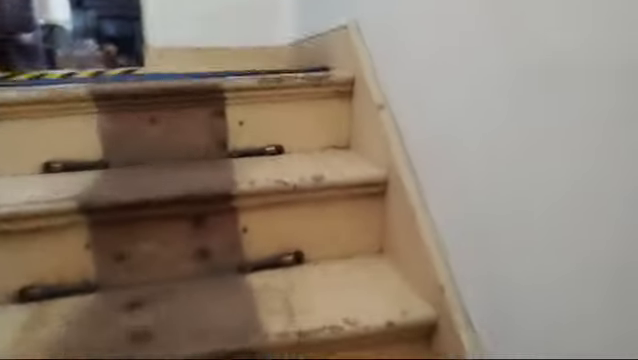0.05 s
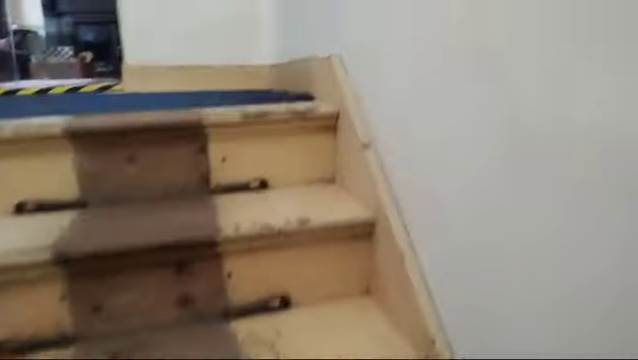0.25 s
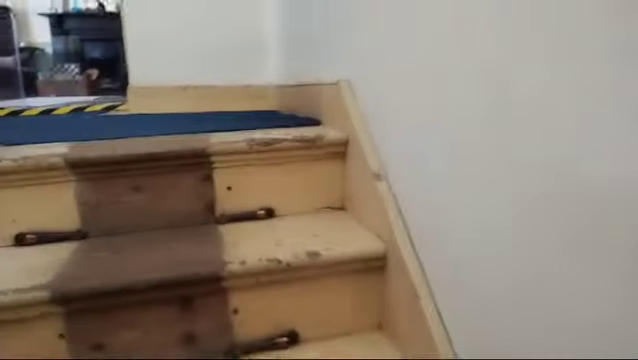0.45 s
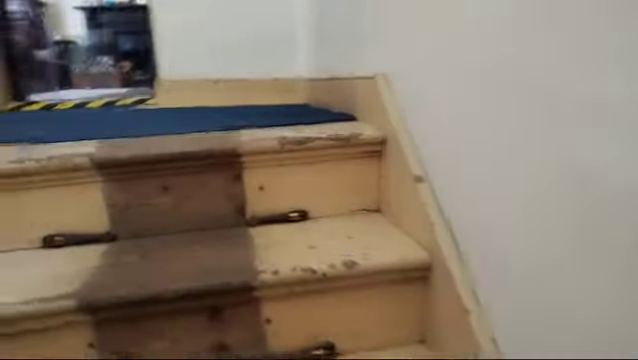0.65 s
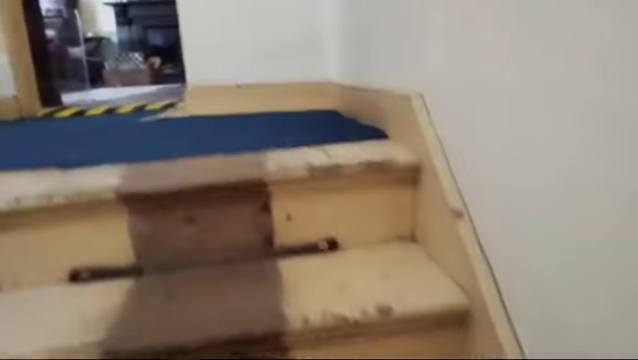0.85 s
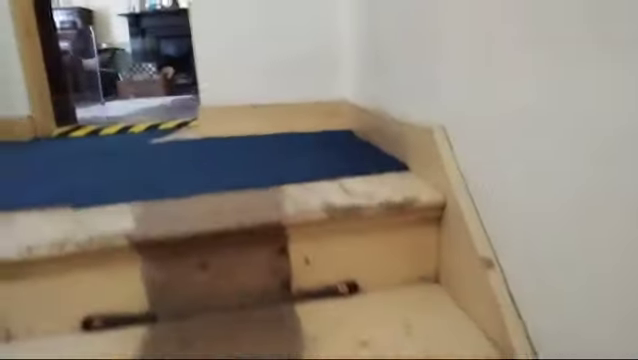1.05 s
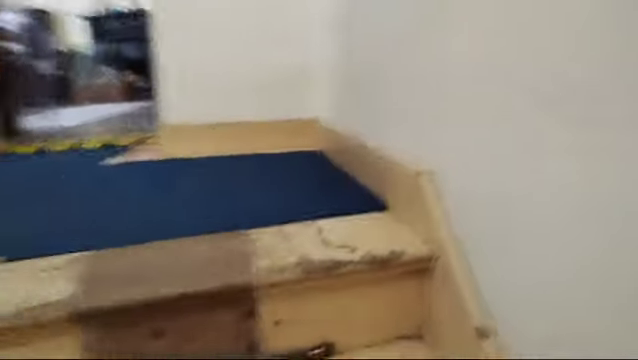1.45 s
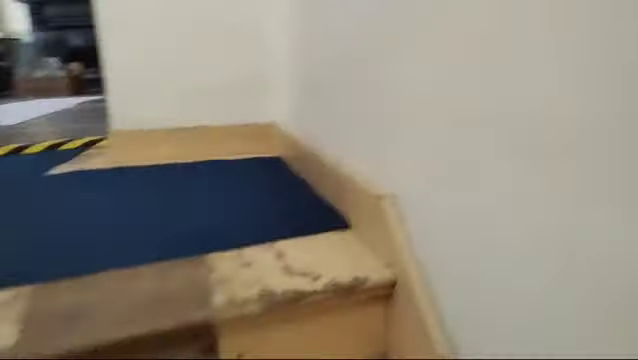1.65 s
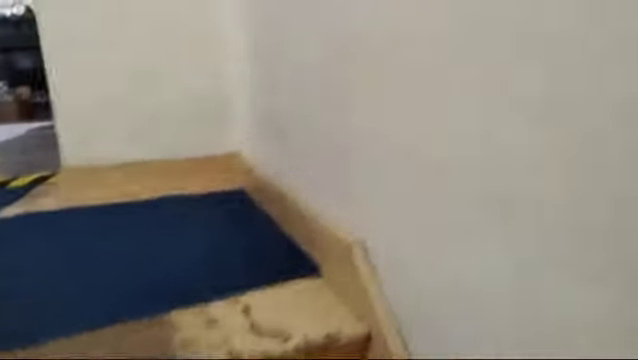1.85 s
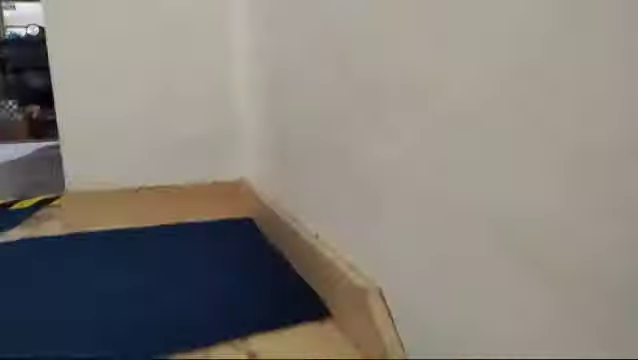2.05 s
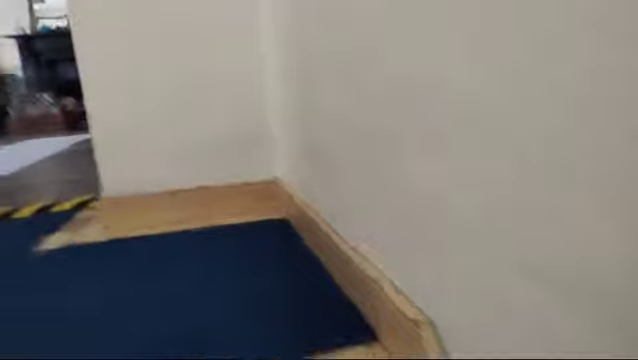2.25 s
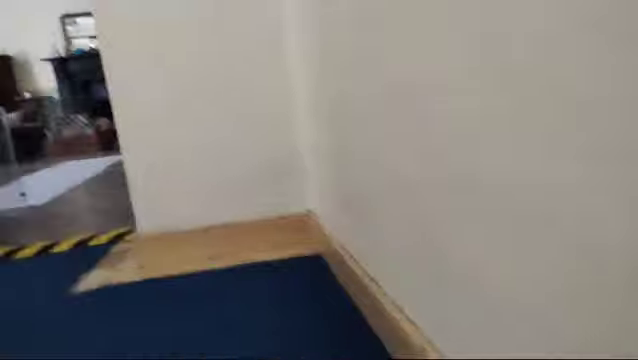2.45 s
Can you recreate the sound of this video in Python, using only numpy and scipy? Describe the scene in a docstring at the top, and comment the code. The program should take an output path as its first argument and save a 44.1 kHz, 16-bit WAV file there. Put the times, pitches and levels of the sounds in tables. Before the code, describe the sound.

Footsteps climbing wooden stairs, low uneven thuds with a sole scuff and faint rustle.

```python
"""Footsteps up a wooden staircase

Someone climbs a narrow stairwell, holding a camera. Four heavy footfalls ring the stair and boom
between the walls, with lighter knocks as the weight shifts. A board cracks, a sole slides over a
tread, clothes rustle, and a finger taps the camera once."""
import sys
import numpy as np
from scipy import signal
from scipy.fft import rfft, irfft, next_fast_len
from scipy.io import wavfile
from scipy.ndimage import uniform_filter1d, map_coordinates

SR = 44100
rng = np.random.default_rng(int(sys.argv[2]) if len(sys.argv) > 2 else 0)


def output_pcm(signal):
    """Save a mono or channel-first signal as 16-bit PCM at the path in sys.argv[1].

    Samples are clipped to [-1, 1] before scaling.
    """
    pcm = np.clip(np.atleast_2d(signal).T, -1, 1) * 32767
    wavfile.write(sys.argv[1], SR, np.round(pcm).astype(np.int16))


N = 110250

# spectrum of the boom between the walls: f/Hz, level/dB
BOOM_SPECTRUM = [(30, -84), (55, -17), (80, -4.5), (130, -0.5), (200, 3), (330, -1.5), (520, -2),
                 (610, -7.5), (760, -13.5), (1000, -16), (1600, -26), (3000, -60)]
TREAD_RISE_S, TREAD_T60_S = 0.0039, 0.13


def amp(db):
    """Decibels to gain."""
    return 10 ** (np.asarray(db) / 20)


def along(points, hz):
    """Read a curve of (frequency, value) points on a log frequency axis."""
    freqs, values = np.transpose(points)
    return np.interp(np.log(hz + 1), np.log(freqs + 1), values)


def filtered(x, response):
    """Equalise x with a gain given as a function of frequency."""
    size = next_fast_len(N + 8192)
    return irfft(rfft(x, size) * response(np.fft.rfftfreq(size, 1 / SR)), size)[..., :N]


def since(start):
    """Seconds since start, zero before it."""
    return np.maximum(np.arange(N) / SR - start, 0)


def swell(start, rise, hold, t60):
    """Envelope with attack, hold and exponential release, all in seconds."""
    t = since(start)
    return (1 - np.exp(-t / rise)) * amp(-60 * np.maximum(t - hold, 0) / t60)


def note(start, hz, rise, t60):
    """One damped mode."""
    return swell(start, rise, 0, t60) * np.sin(2 * np.pi * hz * since(start))


def grain(rate, depth_db):
    """Random flutter of gain, with rate new values a second."""
    knots = rng.standard_normal(int(N * rate / SR) + 4)
    return amp(depth_db * map_coordinates(knots, [np.arange(N) * rate / SR]))


def diffuse(spectrum, colour=lambda hz: 1):
    """Shaped stereo noise of rms 1, narrow in the bass and wide in the treble."""
    # likeness of left and right: f/Hz, correlation
    likeness = [(60, 0.81), (200, 0.92), (450, 0.51), (800, 0.33), (1300, -0.34), (2500, 0.15),
                (5000, 0.0049)]

    def response(hz):
        width = np.arccos(np.clip(along(likeness, hz), -1, 1)) / 2
        return amp(along(spectrum, hz)) * colour(hz) * np.array([np.cos(width), np.sin(width)])
    mid, side = filtered(rng.standard_normal((2, N)), response)
    pair = np.array([mid + side, mid - side])
    power = uniform_filter1d(np.mean(pair ** 2, axis=0), size=2205)
    return pair / np.sqrt(np.abs(power) + 1e-20)


def room_tone():
    """The quiet of the house: a faint, steady bed of low noise."""
    # spectrum of the quiet house: f/Hz, level/dB
    spectrum = [(25, -57), (50, -21), (80, -3), (140, -2.5), (230, 4.5), (400, -0.5), (520, -23),
                (700, -14), (1200, -10.5), (1900, -11.5), (3800, -26), (5600, -20.5), (7400, -9.5),
                (9600, -26.5), (14000, -32.5)]
    return amp(-67) * diffuse(spectrum)


def rustle():
    """Cloth brushes as the legs move, and an airy high hiss swells with each step and movement."""
    # steps and movements: t/s, rise/s, hold/s, brush/dB, hiss/dB
    movements = [(0, 0.0013, 0.0073, -66.5, -69), (0.238, 0.014, 0.11, -58, -59.5),
                 (0.472, 0.01, 0.092, -59, -64.5), (0.639, 0.064, 0.094, -50.5, -56.5),
                 (0.861, 0.0067, 0.028, -66.5, -69), (1.117, 0.013, 0.062, -56, -59.5),
                 (1.195, 0.036, 0.11, -93, -70), (1.314, 0.036, 0.11, -55, -70),
                 (1.381, 0.018, 0.086, -44, -54), (1.946, 0.016, 0.28, -66, -73),
                 (2.262, 0.0048, 0.0067, -57.5, -56.5)]
    # dull brush of cloth: f/Hz, level/dB
    brush_spectrum = [(100, -33), (400, 6), (600, 3.5), (800, 3), (1100, -5), (1900, -5), (3000, -16.5),
                      (5000, -37.5)]
    # airy high hiss: f/Hz, level/dB
    hiss_spectrum = [(2000, -24), (4000, -16.5), (5600, -9.5), (6800, -4), (7500, 0), (8300, -5),
                     (9600, -16.5), (14000, -21.5)]
    brush, hiss = diffuse(brush_spectrum), diffuse(hiss_spectrum)
    swells = sum(swell(start, rise, hold, t60=0.46) * (amp(brush_db) * brush + amp(hiss_db) * hiss)
                 for start, rise, hold, brush_db, hiss_db in movements)
    return grain(rate=140, depth_db=0.8) * swells


def finger_tap():
    """A finger gives the camera body one low push and a thin tick."""
    # tick of the camera body: f/Hz, level/dB
    tick_spectrum = [(500, 8), (2000, -17), (4000, -15), (5600, -6.5), (7400, 7.5), (9500, -17),
                     (14000, -12)]
    start, push_hz, push_t60 = 1.8965, 205, 0.0071
    t = since(start)
    push = -amp(-32.5 - 60 * t / push_t60) * np.sin(2 * np.pi * push_hz * t)
    tick = amp(-39) * swell(start, rise=0.0001, hold=0.00024, t60=0.0023) * diffuse(tick_spectrum)
    return push + tick


def sole_slide():
    """A sole drags over the tread, hissing more as it speeds up."""
    # course of the slide, in relative levels: t/s, rasp/dB, hiss/dB
    course = [(1.5, -65, -71), (1.514, -65, -60), (1.55, -61, -60.5), (1.662, -53, -47.5),
              (1.706, -53, -49), (1.786, -69.5, -71), (1.86, -75.5, -77)]
    # low rasp of sole on wood: f/Hz, level/dB
    rasp_spectrum = [(30, -24), (70, -6), (140, 4.5), (220, 4.5), (320, -1), (700, 2), (1050, -4.5),
                     (1800, -4.5), (2700, -17.5), (4000, -69), (7000, -48)]
    # bright hiss of the slide: f/Hz, level/dB
    hiss_spectrum = [(1500, -12), (3000, -3), (4200, -9), (6400, -5.5), (7100, -1.5), (7550, 4), (8200, -4),
                     (9500, -17), (14000, -27)]
    times, rasp_db, hiss_db = np.transpose(course)
    t = np.arange(N) / SR
    contact = np.interp(t, [times[0] - 0.02, times[0], times[-1], times[-1] + 0.15], [0, 1, 1, 0])
    rasp = amp(10 + np.interp(t, times, rasp_db)) * diffuse(rasp_spectrum)
    hiss = amp(6 + np.interp(t, times, hiss_db)) * diffuse(hiss_spectrum)
    return contact * grain(rate=170, depth_db=0.8) * (rasp + hiss)


def board_cracks():
    """A bright-edged snap briefly rings a board and the microphone, and the walls answer."""
    # cracks of boards and shoes: t/s, snap/dB, ring/dB, room/dB, edge/dB
    cracks = [(0.7412, -33.5, -28.5, -45, -31), (.767, -51, -39.5, -54.5, -65), (1.511, -46, -62, -58, -44),
              (2.129, -46, -56, -61, -72), (2.176, -35.5, -64, -43, -56), (2.284, -43, -50, -55.5, -45)]
    # body of the snap: f/Hz, level/dB
    snap_spectrum = [(200, -18), (700, 7), (1300, -1.5), (1900, -1), (2700, -6), (4000, -13.5),
                     (5600, -10.5), (7400, -3), (9500, -19), (14000, -28)]
    # bright first edge of a crack: f/Hz, level/dB
    edge_spectrum = [(1000, -4), (4000, -3.5), (7400, 3), (10000, -2.5), (14000, -12.5)]
    # ringing tones of the crack, board modes plus a thin high microphone ring: f/Hz, level/dB, t60/s
    tones = [(1446, 7, 0.028), (1780, 1.5, 0.06), (2057, 10, 0.025), (2205, -4, 0.042), (3665, -20, 0.09),
             (7300, 3, 0.053)]
    snap = diffuse(snap_spectrum)
    room = diffuse(snap_spectrum) * grain(rate=840, depth_db=0.5)
    edge = diffuse(edge_spectrum)
    ring_pan = np.array([[-0.6], [1.1]])  # to the right, in opposite phase on the left
    out = np.zeros((2, N))
    for start, snap_db, ring_db, room_db, edge_db in cracks:
        t = since(start)
        ring = sum(amp(db - 60 * t / t60) * np.sin(2 * np.pi * hz * t) for hz, db, t60 in tones)
        attack = 1 - np.exp(-t / 0.0015)
        out += amp(edge_db) * swell(start, rise=0.0001, hold=0.00031, t60=0.0016) * edge
        out += amp(snap_db) * swell(start, rise=0.00011, hold=0.00081, t60=0.036) * snap
        out += amp(ring_db) * attack * ring * ring_pan
        out += amp(room_db) * swell(start, rise=0.0043, hold=0.016, t60=0.2) * room
    return out


def tread_colour(hz, tread_hz):
    """Each spot on the stair favours the frequencies around its own note."""
    width_octaves, off_note_db = 0.57, -12.5
    distance = np.log2((hz + 1) / tread_hz) / width_octaves
    return amp(off_note_db * (1 - np.exp(-0.5 * distance ** 2)))


def stair_ring(start, tread_hz):
    """The stair's modes build up under a soft sole and die away."""
    # modes of the wooden stair: f/Hz, level/dB, t60/s
    modes = [(80.2, -18, 0.82), (120, -6, 0.35), (183, -2.5, 0.37), (223.1, 3.5, 0.34), (236.5, -24, 1.2),
             (271.4, -10, 0.27), (318.4, 1.5, 0.2), (365.7, -6, 0.32), (410, -38, 2.73), (448.6, 2.5, 0.26),
             (481, -11, 0.43), (526, -33, 0.1), (726, 0, 0.19)]
    t = np.arange(SR) / SR
    spread = 0.00042 * np.array([[1], [-1]])  # rad/Hz: higher modes reach the two microphones less alike
    ring = np.zeros((2, SR))
    for k, (hz, db, t60) in enumerate(modes):
        envelope = tread_colour(hz, tread_hz) * amp(db - 60 * t / t60)
        phase = 2 * np.pi * hz * t + (-1) ** (k // 2) * spread * hz
        ring += (-1) ** k * envelope * np.sin(phase)
    build_up = (1 - np.exp(-t / 0.015)) ** 2
    return np.pad(ring * build_up, ((0, 0), (round(start * SR), N)))[:, :N]


def foot_knocks():
    """Toes and heels touch the treads lightly as the weight shifts."""
    # light touches: t/s, stair ring/dB, boom/dB, tread note/Hz, tread note/dB
    knocks = [(.003, -63, -56.5, 250, -68), (0.088, -68, -62, 240, -56), (0.313, -46, -47.5, 208, -76),
              (.479, -47, -50, 179, -41), (0.516, -75, -48.5, 243, -36.5), (0.557, -45, -55, 202, -43),
              (.875, -63, -61.5, 248, -48), (1.122, -56, -54, 537, -51), (1.151, -57, -49.5, 238.7, -40),
              (1.209, -67, -61, 203, -43), (1.287, -48.5, -58, 205, -72), (1.463, -40, -40, 340, -54),
              (1.802, -68, -62, 398, -62), (2.183, -40, -40.5, 492.7, -23.5), (2.278, -67, -50.5, 437, -39),
              (2.419, -59.5, -63.5, 193, -54.5)]
    out, boom = np.zeros((2, N)), diffuse(BOOM_SPECTRUM)
    for start, ring_db, boom_db, tread_hz, tread_db in knocks:
        out += amp(ring_db) * stair_ring(start, tread_hz)
        out += amp(tread_db) * note(start, tread_hz, TREAD_RISE_S, TREAD_T60_S)
        out += amp(boom_db) * swell(start, rise=0.00067, hold=0.0027, t60=0.28) * boom
    return out


def footfalls():
    """The sole touches and slaps, body weight thumps and rings the wood, and the stairwell booms."""
    # heavy steps: t/s, stair ring/dB, boom/dB, boom hold/s, tread note/Hz, tread note/dB,
    # thump/Hz, thump/dB, slap/dB, contact/dB
    steps = [(0.2299, -22.5, -34, 0.081, 305, -31.5, 111, -40.5, -54, -42),
             (0.655, -22.5, -35, 0.098, 374, -42, 82.3, -37, -55, -38),
             (1.397, -33, -34.5, 0.018, 270.6, -32, 88, -33, -54.5, -44),
             (2.129, -38, -31.5, 0.045, 480, -37, 120.7, -27.5, -48, -36.5)]
    # first touch of the sole: f/Hz, level/dB
    contact_spectrum = [(120, -49), (300, -18.5), (520, 5.5), (760, 3), (1050, -28.5), (1900, -30),
                        (3000, -36), (5000, -39), (7400, -39.5), (14000, -60)]
    # slap of the sole: f/Hz, level/dB
    slap_spectrum = [(300, -52), (700, -3), (1100, -6.5), (1800, -8), (2600, -19), (4000, -33),
                     (5600, -30.5), (7400, -17.5), (9500, -31.5), (14000, -49)]
    slap = diffuse(slap_spectrum) * grain(rate=300, depth_db=3.5)
    out = np.zeros((2, N))
    for (start, ring_db, boom_db, boom_hold, tread_hz, tread_db,
         thump_hz, thump_db, slap_db, contact_db) in steps:
        boom = diffuse(BOOM_SPECTRUM, lambda hz: tread_colour(hz, tread_hz))
        contact = diffuse(contact_spectrum)
        out += amp(contact_db) * swell(start, rise=0.00086, hold=0.0085, t60=0.052) * contact
        out += amp(slap_db) * swell(start, rise=0.00041, hold=0.075, t60=0.21) * slap
        out += amp(thump_db) * note(start, thump_hz, rise=0.01, t60=0.165)
        out += amp(tread_db) * note(start, tread_hz, TREAD_RISE_S, TREAD_T60_S)
        # the ball of the foot lands just after the heel
        out += amp(tread_db + 3) * note(start + 0.022, tread_hz, rise=0.0013, t60=0.012)
        out += amp(ring_db) * stair_ring(start, tread_hz)
        out += amp(boom_db) * swell(start, rise=0.0017, hold=boom_hold, t60=0.19) * boom
    return out


def scene():
    """All sources over the quiet of the house, leaning a little to the right."""
    # stereo balance: f/Hz, left minus right/dB
    balance = [(100, -2.8), (200, -3), (450, .3), (800, -1.5), (1400, -6), (2500, -4.5), (4500, 4),
               (8000, -1), (12000, -9)]
    mix = footfalls() + foot_knocks() + board_cracks() + sole_slide()
    mix = mix + rustle() + finger_tap() + room_tone()
    return filtered(mix, lambda hz: amp(np.array([[0.5], [-0.5]]) * along(balance, hz)))


def record(dry):
    """The camera dips bands near or below its noise threshold and cuts off the very top."""
    # threshold of the noise suppressor: f/Hz, band level/dB
    threshold = [(60, -60), (150, -56), (250, -72), (400, -68), (600, -69.5), (1000, -76), (2000, -75),
                 (4000, -92), (7400, -82.5), (14000, -90.5)]
    suppress_db, top_hz = -2, 14400
    band_hz, _, bands = signal.stft(dry, SR, nperseg=512)
    power = np.abs(uniform_filter1d(np.mean(np.abs(bands) ** 2, axis=0), size=3, axis=1))
    weakness = 1 / (1 + power / amp(along(threshold, band_hz))[:, None] ** 2)
    _, suppressed = signal.istft(bands * amp(suppress_db * weakness), SR, nperseg=512)
    return filtered(suppressed[:, :N], lambda hz: hz < top_hz)


dry = scene()
out = record(dry)
output_pcm(out)
```